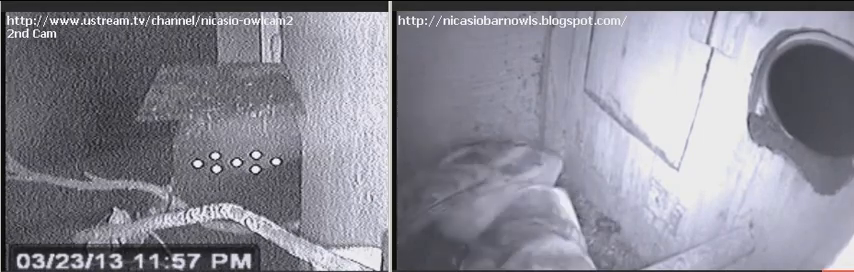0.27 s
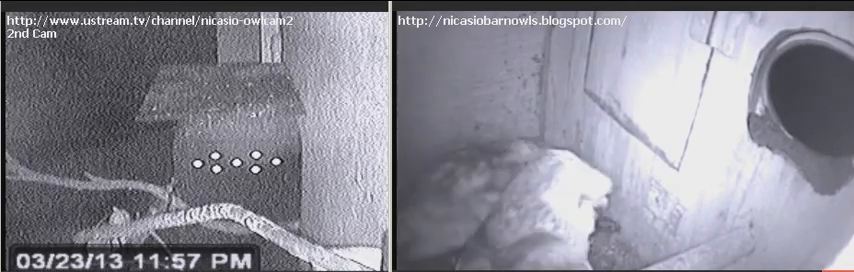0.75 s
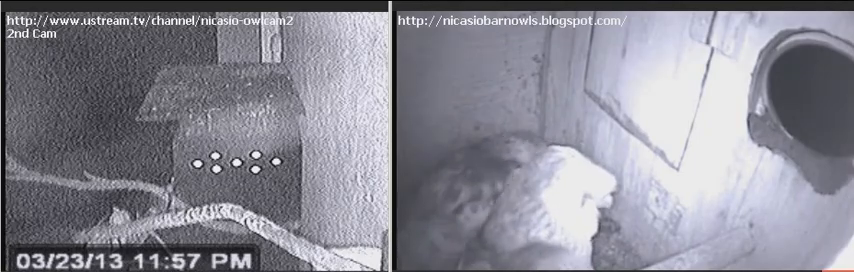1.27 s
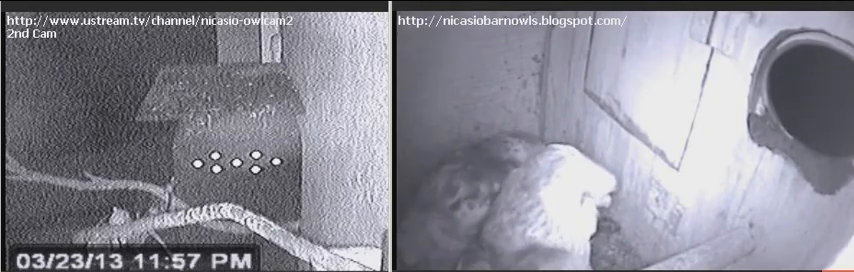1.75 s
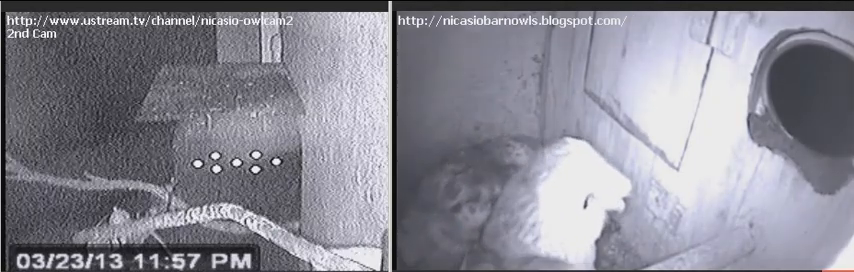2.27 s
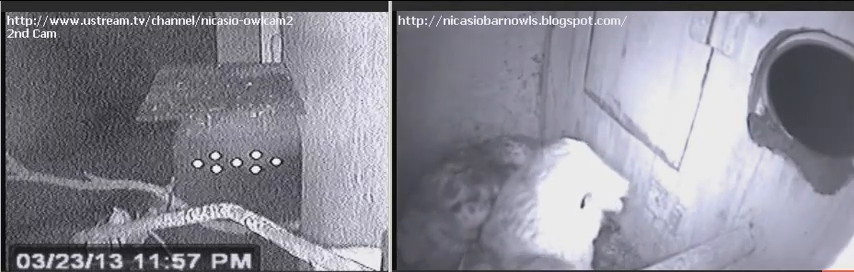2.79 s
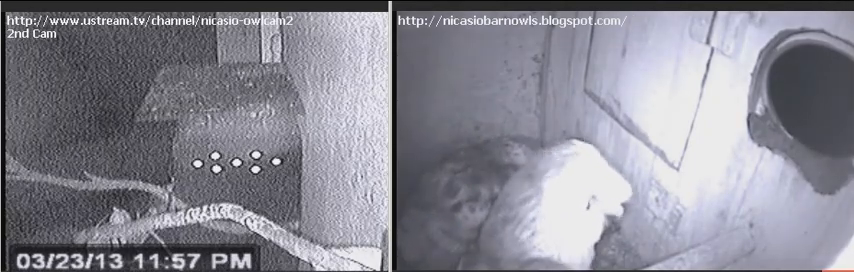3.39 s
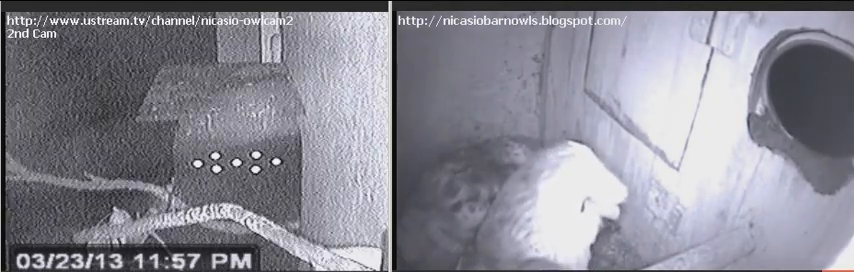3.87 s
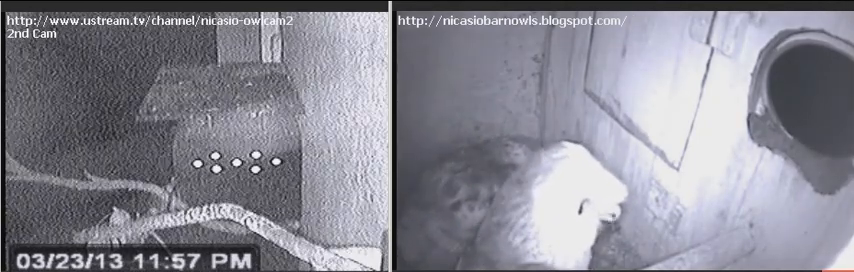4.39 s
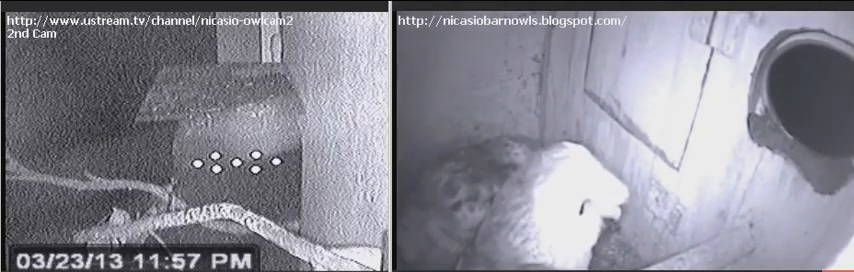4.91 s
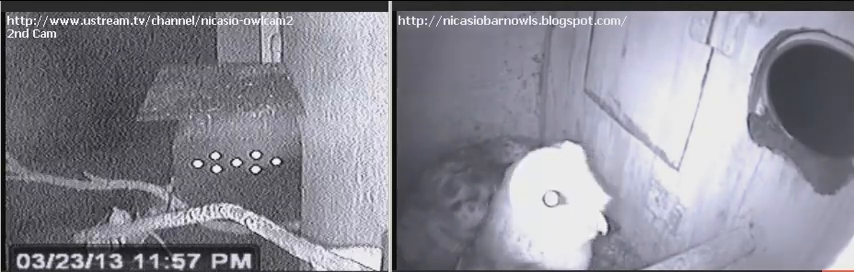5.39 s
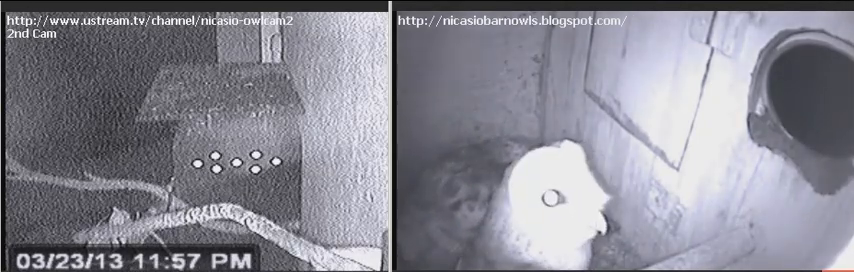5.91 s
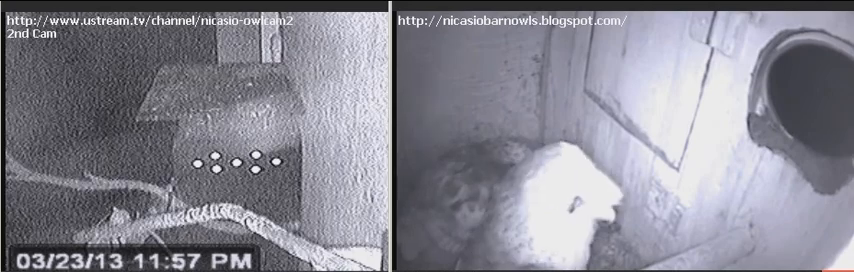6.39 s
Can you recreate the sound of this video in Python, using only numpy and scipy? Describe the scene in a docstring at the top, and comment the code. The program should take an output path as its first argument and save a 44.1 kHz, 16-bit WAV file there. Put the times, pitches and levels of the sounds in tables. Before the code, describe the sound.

A muffled hiss from further off dies away by 0.2 seconds over uneven low night rumble, steady soft hiss, a faint hum and a thin treble buzz. A barn owl then snores very close to a small microphone inside a wooden box, starting at about 0.35, 1.2, 1.9, 2.7, 3.6, 4.5, 5.3 and 6.1 seconds. Each call lasts roughly a third of a second: a tiny upward squeak, then a rushing, throbbing, raspy hiss with two wavering whistles tangled in it, swelling and cutting off quickly. Just after, the bill shuts with a hollow woody knock, sometimes doubled, the last near 6.6. Fainter, duller hisses sound in most gaps. Around 5.9 feathers brush softly and a foot thumps once. The loudest breaths overload with a crunchy edge; the box's reverberation is short and tight.

```python
"""A muffled hiss from further off dies away over night rumble and a faint treble buzz of 128 ticks a second.
A barn owl then snores eight times in a wooden nest box, close to a small microphone that overloads.
Each call opens with a squeak. Both sides of the voice organ whistle at once, as two wavering sines
with mixing products, in rushing, throbbing noise shaped by throat and chest resonances.
The bill shuts with a hollow knock that rings the box; once feathers brush and a foot thumps."""
import sys
import numpy as np
from scipy import signal
from scipy.fft import rfft, irfft, next_fast_len
from scipy.io import wavfile
from scipy.ndimage import uniform_filter1d, map_coordinates

SR = 44100
rng = np.random.default_rng(int(sys.argv[2]) if len(sys.argv) > 2 else 0)


def wav_record(signal):
    """Record a signal, one row per channel, as 16-bit PCM in the file named by sys.argv[1]."""
    frames = np.transpose(np.atleast_2d(signal))
    bounded = np.clip(frames, -1, 1)
    # unit amplitude maps onto the largest positive 16-bit level
    quanta = np.round(bounded * 32767).astype(np.int16)
    wavfile.write(sys.argv[1], SR, quanta)


def voltage_ratio(decibels):
    """Convert decibels (scalar or array-like) to amplitude ratios, 20 dB per decade."""
    exponent = np.asarray(decibels, float) / 20
    return 10 ** exponent


N = 293265
T = np.arange(N) / SR

# Levels in these tables are relative within their layer; layers are balanced where they are mixed.
# colour of the night air: pitch_hz, density_db
NIGHT_COLOUR = [(20, -49), (35, -1.5), (55, -26), (95, 1.5), (130, -2), (310, -2.5), (550, -5.5),
                (1100, -8.5), (1480, -15), (2250, -15), (4000, -26), (7000, -36), (10500, -47.5),
                (12500, -85), (12900, -90)]
# slow rise and fall of the night air: time_s, level_db
NIGHT_LEVEL = [(0, -30), (0.35, -32.5), (1.0, -30.5), (2.0, -29), (2.4, -31.5), (5.7, -31.5), (6.65, -29.5)]
# colour of the treble buzz: pitch_hz, gain_db
BUZZ_COLOUR = [(6000, -30), (8500, 0), (10500, -9), (11000, -30), (11600, -10), (12400, -10), (12700, -50)]
# hisses from further off: start_s, end_s, level_db
FAR_HISSES = [(-.2, 0.166, -36.5), (0.814, 1.156, -35), (1.77, 2.105, -39), (2.309, 2.506, -45),
              (2.894, 3.246, -36), (3.903, 4.286, -36.5), (4.909, 5.267, -35), (5.688, 5.803, -52),
              (5.949, 6.305, -34.5)]
# colour of the far hiss: pitch_hz, density_db
FAR_COLOUR = [(800, -30), (1300, 8.5), (1580, 11.5), (2400, 6), (3150, 9), (3750, 10.5), (3850, -11),
              (4100, -4), (4500, -50)]
# feathers brush, a single event: start_s, peak_s, end_s, peak_db, ends_relative_to_peak_db
FEATHER_BRUSH = (5.825, 5.9, 6.14, -40, -8)
# colour of the feathers: pitch_hz, density_db
FEATHER_COLOUR = [(2500, 2), (4000, -3), (8000, -9), (13000, -23), (13500, -50)]
# colour of the foot thump: pitch_hz, density_db
THUMP_COLOUR = [(60, -30), (120, -5), (330, -1.5), (600, -26), (1200, -19)]
# the bill shuts: centre_s, tap_level_db
BILL_KNOCKS = [(0.7315, -11.5), (0.7527, -22), (1.5657, -13), (1.5781, -20), (2.293, -11.5), (2.3065, -27),
               (3.0964, -13), (4.0313, -11), (4.9214, -14.5), (5.6468, -13), (6.5721, -12.5), (6.5818, -17)]
# hollow resonances, heard in the knocks and the chest rasp: centre_hz, width_hz, gain_db
HOLLOW_MODES = [(310, 61, 4.5), (451, 57, 2.5), (626, 55, 0.5), (834.6, 51, -1), (1434, 130, -1.5)]
# squeaks that open the calls: time_s, level_db, pitch_hz
OPENING_SQUEAKS = [(0.352, -11.5, 2280), (1.1796, -11, 2370), (1.91, -11.5, 2350), (2.723, -12, 2290),
                   (3.612, -13, 2320), (4.492, -9.5, 2317), (5.2739, -11, 2246), (6.1324, -16, 2267)]
# colour of the puff in a squeak: pitch_hz, density_db
PUFF_COLOUR = [(600, -20), (900, 11), (2500, -21), (8000, -11.0), (13500, -24), (14000, -66)]
# the eight calls: opens_s, tail_begins_s, ends_s, effort_db, last_pitch_hz
CALLS = [(.365, .617, .71, 0.5, 1980), (1.196, 1.473, 1.535, -0.5, 1950), (1.922, 2.203, 2.275, -0.5, 1420),
         (2.738, 3.023, 3.075, -1.5, 1550), (3.626, 3.905, 4.005, -0.5, 1430),
         (4.505, 4.788, 4.873, -0.5, 1850), (5.292, 5.57, 5.615, 0.5, 2100), (6.148, 6.46, 6.553, -1, 1480)]
# stages of every call: hiss_db, chest_rasp_db, low_voice_hz, low_voice_db, unsteadiness_0_to_1
# rows: bill opens, breath is in and rasps, rasp eases, throbbing starts, height, tail begins, tail crests
CALL_STAGES = [(-28, -27, 1750, -30, .7), (-20, -20, 1800, -25, .5), (-18, -26, 2100, -20, .3),
               (-15.5, -26, 2050, -18, .3), (-12, -23, 2150, -18, .3), (-20, -30, 2250, -21, .4),
               (-21, -36, 2550, -22, .2)]
# end of every call: hiss_db, chest_rasp_db, pitch_fall_share, low_voice_db
# rows: last swell, halfway, silence
CALL_ENDING = [(-24, -36, 0, -14), (-40, -40, .5, -23), (-56, -44, 1, -35)]
# the high voice, one list per call: time_s, pitch_hz, level_db
HIGH_VOICE = [
    [(0.365, 3334, -40), (0.401, 3023, -29), (0.427, 3223, -27), (0.447, 3046, -16), (0.531, 3211, -24),
     (0.647, 3240, -20), (0.71, 3020, -62)],
    [(1.196, 3050, -36), (1.238, 3198, -23), (1.262, 3256, -23), (1.342, 3076, -20), (1.476, 3125, -19.5),
     (1.488, 3279, -39), (1.535, 3273, -56)],
    [(1.922, 3114, -45), (1.932, 3287, -31), (2.006, 3265, -29), (2.044, 3129, -24), (2.202, 3092, -20.5),
     (2.248, 3332, -28), (2.275, 3133, -44)],
    [(2.738, 3316, -39), (2.788, 3163, -27), (2.93, 3137, -19), (2.948, 3280, -21), (3.028, 3261, -22.5),
     (3.04, 3035, -30), (3.08, 3344, -47)],
    [(3.626, 3203, -42), (3.664, 3041, -30), (3.854, 3207, -18.5), (3.876, 3120, -12), (3.912, 3331, -29),
     (3.956, 3121, -24), (4.005, 3148, -50)],
    [(4.505, 3156, -43), (4.517, 3290, -36), (4.577, 3045, -24), (4.607, 3328, -21), (4.619, 3154, -21.5),
     (4.833, 3299, -21.5), (4.875, 3086, -55)],
    [(5.292, 3031, -41), (5.302, 3340, -31), (5.328, 3120, -25.5), (5.506, 3275, -19), (5.53, 3330, -29),
     (5.552, 3235, -20), (5.615, 3211, -61)],
    [(6.148, 3321, -45), (6.192, 3040, -29), (6.288, 3238, -23.5), (6.406, 3048, -18.5), (6.446, 3296, -27),
     (6.482, 3068, -25), (6.555, 3256, -46)],
]
# throbs of breath: centre_s, level_db, length_ms, low_voice_hz
BREATH_THROBS = [(0.4153, -12, 13.2, 2385), (0.4478, -8.5, 7.9, 1953), (0.472, -9.5, 11.4, 1864),
                 (0.5116, -19, 11.4, 1821), (0.5358, -3, 8.1, 2610), (0.567, -3.5, 10.6, 2700),
                 (0.6, -2, 11, 2236), (0.64, -8.5, 11, 2370), (1.2615, -15.5, 13.4, 2210),
                 (1.2908, -13, 16, 1929), (1.3216, -10.5, 7.6, 1980), (1.3602, -10, 8, 2220),
                 (1.3898, -9.5, 9.2, 1822), (1.422, -9, 9.1, 1819), (1.4599, -8, 4.8, 1820),
                 (1.9403, -34, 11, 1618), (1.9684, -16, 18, 1820), (1.9968, -13, 9.3, 2018),
                 (2.0279, -7.5, 6.9, 2030), (2.068, -7, 5.5, 1903), (2.101, -6.5, 15.7, 1967),
                 (2.1206, -5.5, 11.7, 2668), (2.1597, -23, 9.6, 1834), (2.1951, -8.5, 8.5, 1868),
                 (2.7574, -20.5, 20.3, 1860), (2.8255, -14, 13, 1962), (2.8732, -16, 8, 1860),
                 (2.9056, -6, 8.3, 1575), (2.9346, -4, 13, 2440), (2.973, -6, 8.3, 2355),
                 (3.0063, -1, 14, 2672), (3.6417, -24, 10.8, 1847), (3.6884, -10.5, 6.4, 2105),
                 (3.759, -10, 11, 1940), (3.787, -10, 12.1, 2260), (3.8175, -11, 9.1, 1809),
                 (3.8515, -3, 15.2, 2567), (3.884, -5.5, 10.6, 2642), (3.9276, -13.5, 7.9, 2344),
                 (3.9586, -13, 15.5, 2340), (4.5482, -12.5, 7.6, 1943), (4.5797, -11, 9.6, 2310),
                 (4.616, -15, 7, 2014), (4.642, -10.5, 7.1, 1962), (4.674, -10, 7.8, 1977),
                 (4.7014, -9, 9.8, 1969), (4.7376, -5.5, 9.2, 2633), (4.77, -2.5, 14.4, 2664),
                 (5.3605, -8.5, 12.2, 2044), (5.3924, -10.5, 11.5, 1630), (5.422, -3.5, 14.5, 2344),
                 (5.4558, -4.5, 9.05, 1850), (5.4897, 1, 15.7, 2578), (5.5238, 1.5, 11.5, 2620),
                 (5.559, -5.5, 11.7, 2248), (6.187, -28, 6.3, 1913), (6.2075, -16, 7.7, 2182),
                 (6.2773, -27, 6.9, 1905), (6.3042, -17, 13.5, 2468), (6.339, -9.5, 10.4, 1878),
                 (6.3669, -16, 9.9, 1899), (6.4014, -21, 13.2, 2323), (6.443, -8.5, 11.9, 2738)]
# breath catches: centre_s, level_change_db, length_ms
BREATH_CATCHES = [(.5253, -17, 4.7), (3.8024, -14.5, 8.8), (3.905, -22, 12), (5.3757, 1, 7.6),
                  (5.442, -10.5, 11.7)]
# gulps of rasp in the chest: time_s, level_db, length_ms
CHEST_GULPS = [(0.391, -8.5, 5.9), (0.4725, -12.5, 6.5), (0.5056, -12.5, 15), (0.5369, -13.5, 27),
               (0.5592, -14.5, 5.9), (0.604, -13.5, 23), (1.2219, -16, 21), (1.2919, -11.5, 5.6),
               (1.3906, -26, 7.4), (1.4238, -33, 6.5), (1.937, -14.5, 8.4), (1.9724, -18, 6.8),
               (1.9995, -19.0, 6.9), (2.1252, -12, 6.8), (2.1977, -17, 7.3), (2.7601, -13, 14),
               (2.8446, -15.5, 10.2), (2.9066, -23, 6.6), (2.935, -9, 7.5), (2.9741, -13.5, 6.7),
               (3.0038, -6.5, 8.2), (3.642, -14.5, 6.6), (3.7603, -16, 5.9), (3.7902, -10, 8.9),
               (3.8195, -15.5, 12), (3.8467, -15, 21), (3.8861, -12.5, 9.6), (4.5239, -8, 9.9),
               (4.551, -14.5, 6.3), (4.6151, -20.4, 6.0), (4.6436, -20, 7.6), (4.6615, -10, 7.1),
               (4.699, -9.5, 7.6), (4.7382, -11, 11), (4.7712, -12, 9.5), (5.3031, -12.5, 6.7),
               (5.3295, -15, 5.8), (5.366, -12.5, 10.8), (5.3952, -9, 9.4), (5.419, -8.5, 8.9),
               (5.462, -18.0, 12.7), (5.4812, -15, 15.4), (5.5598, -7.5, 7.6), (6.1633, -14.5, 9.0),
               (6.2555, -18.5, 7.7), (6.2763, -15, 12.9), (6.307, -9, 9.3), (6.3311, -14.5, 5.6),
               (6.3724, -14, 6.2), (6.4076, -16, 8.9), (6.4471, -15.5, 14.7), (6.4751, -20, 15.5)]
# spells of steady, arching whistle: start_s, end_s, top_hz, low_voice_gain_db
CLEAR_SPELLS = [(0.433, 0.467, 2240, 2), (.62, 0.661, 2444, 1.5), (1.309, 1.378, 2067, -3.5),
                (1.956, 1.99, 1860, 4.5), (2.0, 2.025, 2250, 7.5), (2.055, 2.114, 1962, 4),
                (2.781, 2.816, 2266, -4), (3.656, 3.748, 2151, -1), (3.926, 3.965, 2329, 0),
                (4.556, 4.603, 2331, 4), (4.798, 4.839, 2554, -1), (5.319, 5.352, 2194, 4),
                (6.189, 6.248, 2235, -2.5), (6.325, 6.383, 1905, 2)]
# mixing products of the two voices: multiple_of_low, multiple_of_high, level_db
MIX_PRODUCTS = [(2, 0, -6), (3, 0, -12), (1, 1, -6), (0, 2, -7.5), (2, 1, -11), (1, 2, -18.5)]
# colour of the breath before the throat shapes it: pitch_hz, density_db
BREATH_COLOUR = [(710, -35), (1200, -32), (1310, -10.5), (2120, -3.5), (2540, -3), (2880, -10), (3920, -4),
                 (5550, -11), (6580, -3), (10900, -25.5), (15000, -15.5)]
# throat resonances: centre_hz, width_hz, gain_db
THROAT_MODES = [(1886, 69, 9.5), (2320, 21, 8.5), (2610, 130, 3.5), (3276, 200, 0.5), (3870, 128, 10.5),
                (4413, 55, 8.5), (5900, 250, 2), (7280, 140, -34)]

# timing of a call: breath in and rasp begins to ease, both after the bill opens; then settling;
# the body gives way to the tail
ATTACK_S, RASPING_S, SETTLE_S, DROP_S = .016, .045, .06, 0.00795
CREST_SHARE = .55  # share of the way from tail to last swell at which the pitch crests
# the last swell's pitch; its fade lasts the shortest time plus pitch fall / rate
SWELL_HZ, SHORTEST_FADE_S, FADE_STRETCH_HZ_PER_S = 2380, .026, 70000
SQUEAK_RISE_HZ_PER_S, SCOOP_HZ, SCOOP_RISE_HZ_PER_S = 17000, 768, 32300
# in a clear spell: pitch sag at both ends (share), lift of the steady hiss, drop of the steady chest rasp
ARCH_SAG, CLEAR_HISS_DB, CLEAR_CHEST_DB = .07, 1.5, -15.5
GULP_DECAY = 1.6  # a gulp dies this many times slower than it rises
LOW_PUSH = .5  # how strongly (exponent) the push of breath drives the low voice


def unit(x):
    """Brings a signal to an rms of one."""
    return x / np.sqrt(np.mean(x ** 2) + 1e-20)


def wobble(rate):
    """A smooth random curve, rate knots a second."""
    knots = rng.standard_normal(int(N * rate / SR) + 4)
    return map_coordinates(knots, [T * rate])


def filtered(x, response):
    """Shapes x with a complex response of frequency."""
    m = next_fast_len(N + SR // 4)
    spectrum = rfft(x, m) * response(np.fft.rfftfreq(m, 1 / SR))
    return irfft(spectrum, m)[..., :N]


def colour(points):
    """A gain curve through (Hz, dB) points on a log frequency axis."""
    f, db = np.transpose(points)
    return lambda hz: voltage_ratio(np.interp(np.log(hz + 1), np.log(f + 1), db, left=-120, right=-120))


def modes(rows):
    """A causal sum of resonances with alternating sign."""
    def response(f):
        total = 0
        for k, (centre, width, db) in enumerate(rows):
            damping = 1j * f * width
            total = total + (-1) ** k * voltage_ratio(db) * damping / (centre * centre - f * f + damping)
        return total
    return response


def noise(response):
    """White noise shaped by a response, at an rms of one."""
    return unit(filtered(rng.standard_normal(N), response))


def bump(centre_s, length_ms):
    """A round-topped swell centred on one moment."""
    return np.exp(-np.abs((T - centre_s) / (length_ms / 1600)) ** 2.307)


def gulp(peak_s, length_ms):
    """A swell that comes fast and dies more slowly."""
    rise_ms = 2 * length_ms / (1 + GULP_DECAY)
    return np.where(T < peak_s, bump(peak_s, rise_ms), bump(peak_s, GULP_DECAY * rise_ms))


def night():
    """Noise with uneven rumble and steady hiss, a treble buzz of regular ticks and an unsteady hum."""
    times, db = np.transpose(NIGHT_LEVEL)
    air = noise(colour(NIGHT_COLOUR))
    rumble = filtered(air, lambda hz: 1 / (1 + (hz / 1400) ** 4))
    hiss = air - rumble
    air = hiss + rumble * voltage_ratio(1.2 * wobble(14) + 1.4 * wobble(60))
    ticks = np.diff(np.floor(128 * T), prepend=0)  # 128 a second
    buzz = voltage_ratio(-63.5) * unit(filtered(ticks, colour(BUZZ_COLOUR)))
    hum = voltage_ratio(-40 + 2.6 * wobble(8.8)) * np.sin(2 * np.pi * 61 * T + 0.45 * wobble(12))
    return voltage_ratio(np.interp(T, times, db) + 1.5) * air + buzz + hum


def far_hiss():
    """Muffled noise with a faint wavering whistle and its octave, fading in faster than out."""
    level = 0
    for start, end, db in FAR_HISSES:
        fade_in, fade_out = np.clip((T - start) / 0.016, 0, 1), np.clip((end - T) / 0.096, 0, 1)
        level = level + voltage_ratio(db) * fade_in * fade_out
    phase = 2 * np.pi * np.cumsum(1578 * (1 + 0.0029 * wobble(30))) / SR
    whistle = voltage_ratio(-14 + 2.5 * wobble(12)) * (np.sin(phase) + .6 * np.sin(2 * phase))
    return level * voltage_ratio(1.5 * wobble(40)) * (noise(colour(FAR_COLOUR)) + whistle)


def rustle():
    """Feathers brush the wall: flickering treble noise that swells and falls."""
    start, peak, end, db, ends_db = FEATHER_BRUSH
    swell_db = np.interp(T, [start, peak, end], [db + ends_db, db, db + ends_db], left=-120, right=-120)
    return voltage_ratio(swell_db + 2.1 * wobble(70)) * noise(colour(FEATHER_COLOUR))


def foot_thump():
    """A foot thumps once on the floor: a short swell of low noise."""
    return voltage_ratio(-21.5) * bump(5.893, 33) * noise(colour(THUMP_COLOUR))


def knocks():
    """The bill shuts: a soft tap, then the hollow box rings through its resonances."""
    taps = np.zeros(N)
    for centre, db in BILL_KNOCKS:
        u = (T - centre) / 0.00054
        taps += voltage_ratio(db) * (1 - u ** 2) * np.exp(-u ** 2 / 2)
    return taps + voltage_ratio(1) * filtered(taps, modes(HOLLOW_MODES))


def squeaks():
    """A few climbing milliseconds of the low voice, a fainter, lower sweep and a puff of air."""
    out, puff = np.zeros(N), noise(colour(PUFF_COLOUR))
    for at, db, hz in OPENING_SQUEAKS:
        t = np.clip(T - at + .002, 0, None)
        x = t / .006
        swell = 1.5 * x ** 1.2 * np.exp(-x ** 1.7)
        # the climb crosses the listed pitch 7 ms in
        phase = 2 * np.pi * (hz * t + SQUEAK_RISE_HZ_PER_S * (t - .014) * t / 2) + 1.5 * wobble(250)
        scoop = .18 * np.sin(2 * np.pi * (SCOOP_HZ + SCOOP_RISE_HZ_PER_S * t / 2) * t)
        out += voltage_ratio(db) * swell * (np.sin(phase) + 0.078 * np.sin(2 * phase) + scoop + 0.35 * puff)
    return out


def stages():
    """Breath and voice controls, one value per sample, and where the bill is open."""
    times, rows = [], []
    for opens, tail, ends, effort_db, last_hz in CALLS:
        swell = ends - SHORTEST_FADE_S - (SWELL_HZ - last_hz) / FADE_STRETCH_HZ_PER_S
        rasp_end = opens + RASPING_S
        times += [opens, opens + ATTACK_S, rasp_end, rasp_end + SETTLE_S, tail - DROP_S, tail,
                  tail + CREST_SHARE * (swell - tail), swell, (swell + ends) / 2, ends]
        ending = [(hiss, rasp, SWELL_HZ + share * (last_hz - SWELL_HZ), low, 0)
                  for hiss, rasp, share, low in CALL_ENDING]
        effort = effort_db * np.array([1, 1, 0, 1, 0])  # raises or lowers levels only
        rows += [np.add(row, effort) for row in CALL_STAGES + ending]
    high_times, *high = np.concatenate(HIGH_VOICE).T
    is_open = sum(1. * (T > call[0]) * (T < call[2]) for call in CALLS)
    controls = [np.interp(T, times, column) for column in np.transpose(rows)]
    high_controls = [np.interp(T, high_times, column) for column in high]
    return controls + high_controls + [uniform_filter1d(is_open, size=300)]


def spells(low_hz):
    """How clear the voice is (0-1), the low voice's gain, and its pitch arched over each clear spell."""
    clear = gain_db = 0
    for start, end, top_hz, db in CLEAR_SPELLS:
        inside = np.clip(np.minimum(T - start, end - T) / .006 + .5, 0, 1)
        arch = top_hz * (1 - ARCH_SAG * (2 * (T - start) / (end - start) - 1) ** 2)
        clear, gain_db = clear + inside, gain_db + db * inside
        low_hz = low_hz + inside * (arch - low_hz)
    return clear, gain_db, low_hz


def owl():
    """Two whistles and their mixing products, torn up by turbulent, throbbing breath."""
    hiss_db, rasp_db, low_hz, low_db, unsteady, high_hz, high_db, breathing = stages()
    throb = 0
    for at, db, ms, hz in BREATH_THROBS:
        throb = throb + voltage_ratio(db - 4.0) * bump(at, ms)
        low_hz = low_hz + (hz - low_hz) * bump(at, 1.5 * ms)  # each throb pulls the low voice to its pitch
    clear, gain_db, low_hz = spells(low_hz)
    low_db, rasp_db = low_db + gain_db, rasp_db + CLEAR_CHEST_DB * clear

    flow = np.hypot(voltage_ratio(hiss_db - 2.5 + CLEAR_HISS_DB * clear), throb)
    push = flow / uniform_filter1d(flow, size=3000)  # throbs drive voices and chest too
    gulps = sum(voltage_ratio(db) * gulp(at - .001, ms) for at, db, ms in CHEST_GULPS)
    rasp = np.hypot(voltage_ratio(rasp_db) * push, gulps)
    chaos = np.clip(7 * rasp + unsteady, 0, 1) * (1 - 0.64 * clear)  # more rasp, less steady voices

    low_jitter = (.18 + 1.7 * chaos) * wobble(380)
    low = 2 * np.pi * np.cumsum(low_hz * (1 + .012 * wobble(60))) / SR + low_jitter
    high_jitter = (.12 + 1.5 * chaos ** 2) * wobble(340)
    high = 2 * np.pi * np.cumsum(high_hz * (1 + .004 * wobble(60))) / SR + high_jitter

    def flutter():
        """Random level flutter, deeper with chaos."""
        return 1 + np.clip(.3 + 1.3 * chaos, 0, 1) * np.tanh(1.3 * wobble(130))

    low_tone = voltage_ratio(low_db + 3) * push ** LOW_PUSH * flutter() * np.sin(low)
    high_tone = voltage_ratio(high_db + 4.5) * flutter() * np.sin(high)
    both = np.clip(voltage_ratio(high_db - low_db + 18.5), 0, 1)  # products of the high voice need it to sound
    products = 0
    for m, n, db in MIX_PRODUCTS:
        level = voltage_ratio(db) * both ** n * (1 + 0.31 * (1 - both))
        products = products + level * flutter() * np.sin(m * low + n * high)

    throat = modes(THROAT_MODES)
    air = noise(lambda hz: colour(BREATH_COLOUR)(hz) * (1 + np.abs(throat(hz))))
    air = unit(air * (1 + 0.38 * np.cos(low)) * voltage_ratio(0.87 * wobble(260)))  # puffs once per vibration
    chest = noise(lambda hz: modes(HOLLOW_MODES)(hz) / (1 + (230 / (hz + 1)) ** 6))
    chest = rasp * unit(chest * voltage_ratio(2.2 * wobble(90)))

    opening = breathing * voltage_ratio(sum(db * bump(at, ms) for at, db, ms in BREATH_CATCHES))
    voices = push ** 0.25 * (low_tone + high_tone) + flow * products
    voices = filtered(voices, lambda hz: 0.76 + 0.3 * np.abs(throat(hz)))  # louder near a resonance
    return opening * (voices + flow * (0.78 + .5 * chaos) * air + chest)


def box(x):
    """Small wooden walls answer with a dense noise tail that falls 60 dB in 45 ms."""
    t = T[:SR // 8]
    tail = rng.standard_normal(len(t)) * voltage_ratio(-60 * t / .045)
    return signal.fftconvolve(x, tail / np.linalg.norm(tail))[:N]


def scene():
    """The owl inside its answering box, over the rustle, far hiss and night, alike in both channels."""
    near = foot_thump() + knocks() + squeaks() + owl()
    near = near + voltage_ratio(-14) * box(near)
    mono = night() + far_hiss() + rustle() + near
    return np.array([mono, mono])


def low_pass(x):
    """Removes everything above the highest recorded frequency."""
    return signal.sosfilt(signal.butter(12, 15630, fs=SR, output="sos"), x)


def record(dry):
    """The input overloads softly on peaks; faint treble patches flicker in opposite polarity left and right."""
    x = dry / (1 + np.abs(dry / 1.04) ** 6) ** (1 / 6)
    x = filtered(x, lambda hz: 1 / (1 + (hz / 15100) ** 40))
    hz, _, z = signal.stft(x[0], SR, nperseg=1024)
    field = uniform_filter1d(rng.standard_normal(z.shape), size=14, axis=0)  # smooth across frequency
    field = unit(uniform_filter1d(field, size=3, axis=1))  # and across time
    random_phase = np.exp(2j * np.pi * rng.random(z.shape))
    patches = (field > .6) * (hz[:, None] > 1900) * random_phase
    flicker = voltage_ratio(-16) * signal.istft(z * patches, nperseg=1024)[1][:N]
    mix = x + np.array([flicker, -flicker])
    return low_pass(mix)


dry = scene()
out = record(dry)
wav_record(out)
```